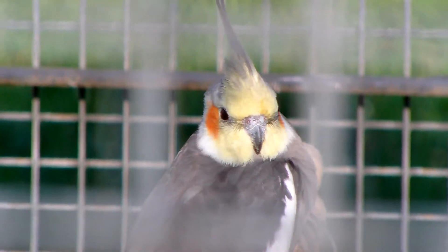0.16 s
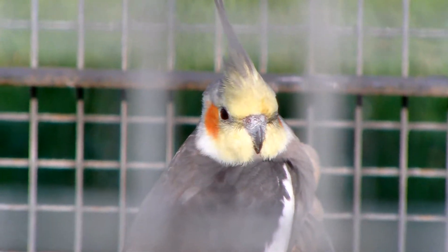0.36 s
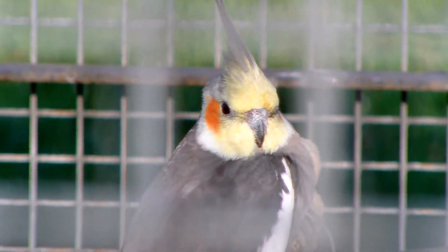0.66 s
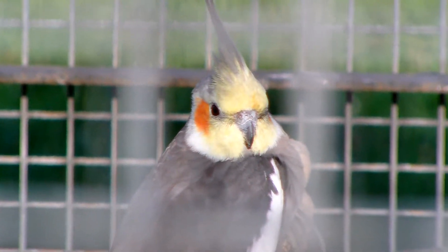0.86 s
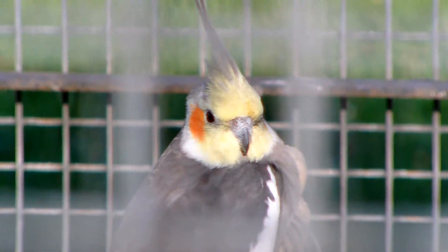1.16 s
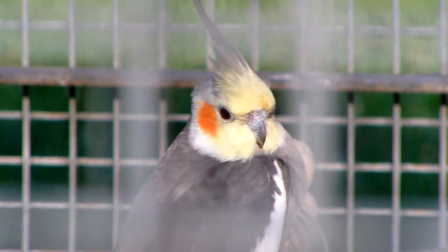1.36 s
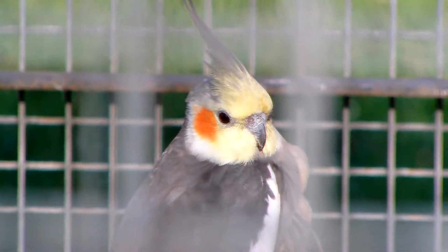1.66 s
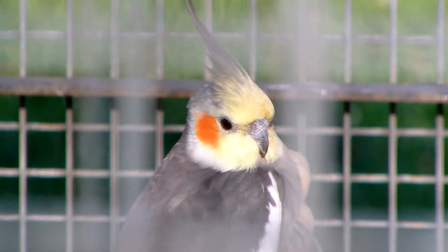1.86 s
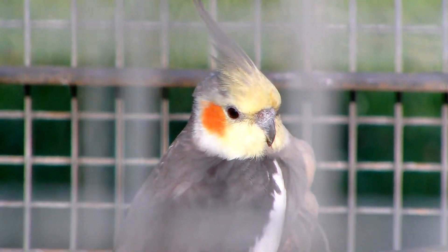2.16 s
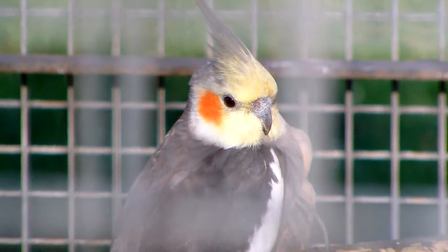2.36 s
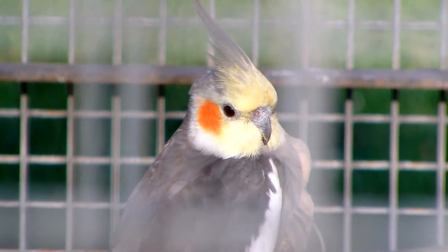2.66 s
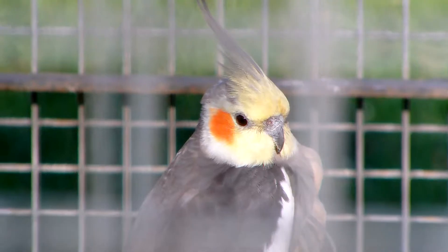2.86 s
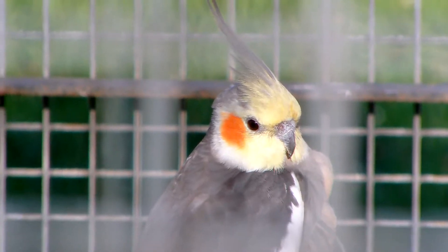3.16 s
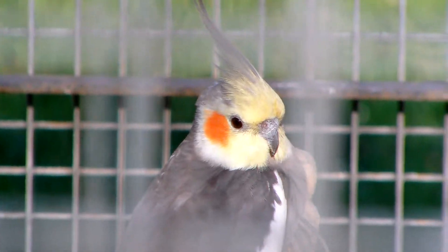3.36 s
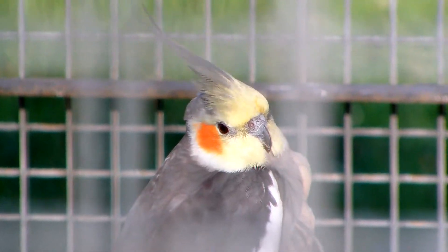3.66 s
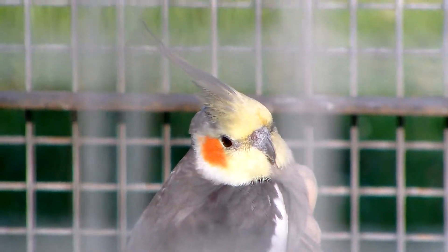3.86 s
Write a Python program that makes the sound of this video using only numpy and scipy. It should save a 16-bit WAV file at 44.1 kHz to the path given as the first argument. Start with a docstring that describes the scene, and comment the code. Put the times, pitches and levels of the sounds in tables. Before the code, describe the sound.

A nearby cockatiel opens with one loud, very short falling shriek, briefly echoed by close walls. From about 2.1 to 2.7 seconds it gives a softer, buzzing call that rises in two steps. Small dry ticks come now and then, and distant birds whistle faintly from 1 second. Two brief, soft rustles follow near 3.5 and 4 seconds. A quiet steady rush and low hum lie underneath throughout.

```python
"""At a wire aviary, one microphone near a cockatiel, walls close by. A steady rush and low hum lie
under everything. The bird opens with a loud falling shriek in a faint haze of noise, and the
walls answer. Small dry ticks follow now and then, and from about 1 s other birds whistle far off.
Just after 2 s the cockatiel gives a softer call that rises in two steps, buzzing with a fast trill.
Two brief, soft rustles come near the end."""
import sys
import numpy as np
from scipy import signal
from scipy.fft import rfft, irfft, next_fast_len
from scipy.io import wavfile
from scipy.ndimage import map_coordinates

SR = 44100
rng = np.random.default_rng(int(sys.argv[2]) if len(sys.argv) > 2 else 0)


def store_pcm(level_fs):
    """Save levels as 16-bit WAV."""
    pcm = np.round(np.clip(level_fs, -1, 1) * 32767).astype(np.int16)
    wavfile.write(sys.argv[1], SR, np.atleast_2d(pcm).T)


N = 176400  # 4 s

# colours of the background rush, rumble and hiss (frequency [Hz], relative level [dB])
RUSH_COLOUR = [(190, -35.5), (330, -3), (777, 1), (1110, 1), (2260, -8), (3850, -10.5), (7350, -13.5),
               (11200, -21.5), (15700, -15)]
RUMBLE_COLOUR = [(10, -20.5), (25, 4.5), (50, -10), (110, -16.5), (190, -13.5), (330, -14), (600, -37)]
HIGH_COLOUR = [(1500, -28.5), (5000, -3), (8500, 4.5), (11500, -8.5), (16000, -18.5)]
# hollows in the rush and rumble (frequency [Hz], half width [Hz], depth [0-1])
HOLLOWS = [(302, 43, 0.7), (902, 60, .7)]
# course of the hiss (time [s], level [dB])
HISS_LEVEL = [(0, -77.5), (.44, -69), (.46, -64), (1.1, -67.5), (4, -71.5)]

# the shriek's fundamental (time [s], pitch [Hz])
SHRIEK_GLIDE = [(0, 3627), (.03, 3927), (.052, 3820), (.068, 3526), (.084, 3380), (.089, 3605),
                (.093, 3020), (.102, 2886), (.144, 2780), (.149, 2484), (.156, 2220), (.163, 1720)]
# its strength (time [s], fundamental [dB], overtones [dB], roughness [0-1])
SHRIEK_SHAPE = [(.002, -16, -33, 0.05), (.04, -17, -29.5, 0.02), (.07, -12.5, -26, 0.01),
                (.094, -21, -25, .12), (.115, -20.5, -21, .06), (.143, -14.5, -24.5, .05),
                (.15, -18, -16, .3), (.16, -37, -17.5, 0)]
# colours of its overtones and of a faint haze that swells with it (frequency [Hz], relative level [dB])
SHRIEK_COLOUR = [(3500, 14), (5600, -3.5), (7400, -0.5), (8700, -15), (10400, -3), (11400, -15),
                 (12500, -23), (14500, -16.5), (16000, -20)]
HAZE_COLOUR = [(25, 2.5), (100, -19.5), (170, -7.5), (260, -11.5), (3500, -13), (15000, -9.5)]
# the answer from the walls (frequency [Hz], time to fall 60 dB [s])
WALL_DECAY = [(500, 0.22), (2700, 0.12), (6000, 0.14), (14000, 0.098)]

# small dry ticks (time [s], level [dB])
TICK_HITS = [(0.763, -50), (1.037, -56.5), (1.405, -54.5), (2.432, -44), (3.033, -47.5), (3.339, -57),
             (3.673, -55.5), (3.866, -46)]
# what a tick rings with (frequency [Hz], relative level [dB])
TICK_RING = [(2884, 1), (4250, -8.5), (8500, -17)]

# far birds, short and long notes (time [s], length [s], from pitch [Hz], to pitch [Hz], level [dB])
FAR_CHIRPS = [(.99, .064, 5630, 5250, -69), (1.15, .1, 6900, 6560, -69), (1.655, .051, 4050, 3230, -66),
              (3.0, .073, 7500, 6300, -64.5), (3.25, .08, 6400, 5570, -66)]
FAR_LONG_NOTES = [(1.67, .22, 4760, 4735, -68), (1.78, 1.35, 5630, 5600, -71), (3.03, .8, 3270, 3060, -71),
                  (3.82, .165, 3065, 3035, -66)]

# the rising call (time [s], pitch [Hz], fundamental [dB], overtones [dB],
# overtone loss [dB/octave], trill depth [share of pitch])
RISING_SHAPE = [(2.142, 1410, -55.5, -46, 3, 0.0073), (2.18, 1520, -59, -46, -0.5, 0.019),
                (2.22, 1660, -51, -39.5, 2.5, 0.033), (2.257, 1730, -47, -43, -0.5, 0.042),
                (2.308, 1700, -47, -40, 1.5, 0.047), (2.345, 1690, -62, -42.5, 4, 0.021),
                (2.385, 1710, -49, -48.5, 12, 0.05), (2.407, 1610, -69, -46, -0.5, 0.054),
                (2.445, 1875, -47, -34.5, 11, 0.017), (2.485, 1930, -40.5, -30.5, 12.5, .008),
                (2.51, 2090, -42, -40, 7, 0.049), (2.547, 2335, -37, -45.5, 4.5, 0.052),
                (2.634, 2290, -36.5, -42.5, 10, 0.046), (2.674, 2400, -33, -41, 9, 0.032),
                (2.72, 2420, -40.5, -38, 2.5, 0.029), (2.739, 2170, -44, -35, 24, 0.098)]
# its trill (time [s], rate [Hz])
TRILL_SPEED = [(2.36, 125), (2.52, 161.8)]
# colours of the throat and of the call's air noise (frequency [Hz], relative level [dB])
THROAT_COLOUR = [(3400, 0), (3850, 6), (4300, -4), (4800, 0), (5750, 1), (7000, -2), (7800, -7), (9700, -8),
                 (11000, -17), (12100, -12), (13500, -26)]
RASP_COLOUR = [(1200, -5), (8500, -0.5), (16000, -8.5)]

# soft rustles (time [s], half length [s], level [dB])
RUSTLE_SWELLS = [(3.463, 0.013, -59), (3.953, 0.016, -61.5)]


def amp(db):
    """Decibels to gain."""
    return 10 ** (np.asarray(db) / 20)


def clock():
    """The time of each sample."""
    return np.arange(N) / SR


def along(points, hz):
    """Read (frequency, value) points on a log axis."""
    freqs, values = np.transpose(points)
    return np.interp(np.log(hz + 1), np.log(freqs + 1), values)


def curves(rows):
    """One value per sample for each column after the time."""
    times, *columns = np.transpose(rows)
    return [np.interp(clock(), times, column) for column in columns]


def wobble(rate):
    """A smooth random curve, rate knots a second."""
    return map_coordinates(rng.standard_normal(N // 8), [clock() * rate + 2], mode="wrap")


def filtered(x, response):
    """Shape x by a gain that depends on frequency."""
    size = next_fast_len(N + SR // 2)
    return irfft(rfft(x, size) * response(np.fft.rfftfreq(size, 1 / SR)), size)[:N]


def noise(colour):
    """Coloured noise of rms 1."""
    x = filtered(rng.standard_normal(N), lambda hz: amp(along(colour, hz)))
    return x / np.sqrt(np.mean(x ** 2) + 1e-20)


def gate(start, end, attack_s, release_s):
    """1 from start to end, with ramps before and after."""
    t = clock()
    return np.clip(1 + (t - start) / attack_s, 0, 1) * np.clip(1 - (t - end) / release_s, 0, 1)


def phase_of(hz):
    """The running phase of a changing frequency."""
    return 2 * np.pi * np.cumsum(hz) / SR


def tone(hz):
    """A sine of rms 1 that follows a pitch."""
    return np.sqrt(2) * np.sin(phase_of(hz))


def harmonics(pitch, orders, gains):
    """A stack of partials of rms 1 on one pitch."""
    gains = gains * (orders * pitch < SR / 2)
    stack = np.sum(gains * np.sin(orders * phase_of(pitch)), axis=0)
    return np.sqrt(2) * stack / np.sqrt(np.sum(gains ** 2, axis=0) + 1e-20)


def background():
    """The background: a rush and a rumble with two narrow hollows in them, a wavering hum and a little high
    hiss."""
    def hollows(hz):
        dips = [1 - min(depth, 1) * np.exp(-((hz - centre) / width) ** 2)
                for centre, width, depth in HOLLOWS]
        return np.prod(dips, axis=0)

    rush = amp(-59.5) * noise(RUSH_COLOUR)
    rumble = amp(-69.5 + wobble(6.1)) * noise(RUMBLE_COLOUR)
    hum = amp(-81.5) * tone(hz=210 * (1 + .046 * wobble(47)))
    hiss = amp(curves(HISS_LEVEL)[0]) * noise(HIGH_COLOUR)
    return filtered(rush + rumble, hollows) + hum + hiss


def shriek():
    """The near cockatiel: a whistle that arches, breaks to a lower note and plunges, growing harsher."""
    jitter, flutter_db, haze_db = .007, 2, -23.5
    pitch = curves(SHRIEK_GLIDE)[0] * (1 + jitter * wobble(300))
    base_db, over_db, rough = curves(SHRIEK_SHAPE)
    orders = np.arange(2, 7)[:, None]
    flutter = amp(flutter_db * np.array([wobble(160) for _ in orders]))
    overtones = harmonics(pitch, orders, flutter * amp(along(SHRIEK_COLOUR, orders * pitch)))
    voice = amp(base_db) * tone(pitch) + amp(over_db) * overtones
    voice *= (1 + rough * wobble(1800)) / np.hypot(1, rough)
    haze = amp(haze_db) * np.hypot(amp(base_db), 2 * amp(over_db)) * noise(HAZE_COLOUR)
    return (voice + haze) * gate(SHRIEK_SHAPE[0][0], end=.16, attack_s=.0035, release_s=.0035)


def with_walls(x, wet_db):
    """At the microphone: the direct sound, a short answer from nearby walls and a faint, dull tail."""
    late_db, late_t60_s, delay_s = -30.5, .99, .0027
    hz, t, spectrum = signal.stft(rng.standard_normal(SR), SR, nperseg=256)
    early = amp(-60 * t / along(WALL_DECAY, hz)[:, None])
    late = amp(late_db - 60 * t / late_t60_s) / (1 + (hz[:, None] / 7000) ** 2)
    echo = signal.istft(spectrum * (early + late), SR, nperseg=256)[1]
    echo *= np.arange(len(echo)) / SR > delay_s
    wet = signal.fftconvolve(x, echo / np.linalg.norm(echo))[:N]
    return (x + amp(wet_db) * wet) / np.sqrt(1 + amp(wet_db) ** 2)


def ticks():
    """Each tick is one short ring and a snap of noise; harder ticks snap more."""
    peak_s, snap_t60_s, snap_growth = .0017, .01, 1.3
    out, hiss = np.zeros(N), noise(HIGH_COLOUR)
    loudest_db = max(db for _, db in TICK_HITS)
    for start, db in TICK_HITS:
        t = np.maximum(clock() - start, 0)
        envelope = t / peak_s * np.exp((1 - (t / peak_s) ** 2) / 2)
        ring = sum(amp(level) * np.sin(2 * np.pi * hz * t) for hz, level in TICK_RING)
        snap_db = -1 + snap_growth * (db - loudest_db)
        snap = (t > 0) * amp(snap_db - 60 * t / snap_t60_s) * hiss
        out += amp(db) * (envelope * ring + snap)
    return out


def far_whistles(notes, jitter):
    """Birds far from the microphone: faint gliding tones that swell, flicker and fade."""
    flicker_share, flicker_hz = .75, 90
    out = np.zeros(N)
    for start, length, from_hz, to_hz, db in notes:
        progress = np.clip((clock() - start) / length, 0, 1)
        pitch = (from_hz + (to_hz - from_hz) * progress) * (1 + jitter * wobble(330))
        phase = phase_of(pitch)
        flicker = wobble(flicker_hz) * np.sin(phase) + wobble(flicker_hz) * np.cos(phase)
        whistle = np.sqrt(1 - flicker_share) * tone(pitch) + np.sqrt(flicker_share) * flicker
        swell = (4 * progress * (1 - progress)) ** .25
        out += amp(db) * swell * whistle
    return out


def rising_call():
    """A reedy tone climbs in two steps; a fast trill makes it buzz, loudest at the top of each swing."""
    jitter, trill_unevenness, pulse_depth = .008, .12, .4
    rasp_db, rasp_growth = -59, .44  # the air noise grows with the overtones
    pitch, base_db, over_db, loss_db, depth = curves(RISING_SHAPE)
    trill_hz = curves(TRILL_SPEED)[0] * (1 + trill_unevenness * wobble(90))
    trill = np.sin(phase_of(trill_hz))
    pitch *= 1 + depth * trill + jitter * wobble(700)
    orders = np.arange(2, 7)[:, None]
    throat = amp(along(THROAT_COLOUR, orders * pitch) - loss_db * np.log2(orders))
    voice = amp(base_db) * tone(pitch) + amp(over_db) * harmonics(pitch, orders, throat)
    rasp = amp(rasp_db + rasp_growth * (over_db - over_db.mean())) * noise(RASP_COLOUR)
    pulsing = 1 + pulse_depth * trill * depth / depth.max()
    envelope = gate(RISING_SHAPE[0][0], RISING_SHAPE[-1][0], attack_s=.0045, release_s=.0032)
    return envelope * pulsing * (voice + rasp)


def rustles():
    """Two brief, soft swells of high noise."""
    swells = sum(amp(db) * np.exp(-.5 * ((clock() - at) / half) ** 2) for at, half, db in RUSTLE_SWELLS)
    return swells * noise(HIGH_COLOUR)


def scene():
    """The aviary in mono: shriek and ticks fairly dry, more of the walls on the other calls."""
    cockatiel = with_walls(shriek(), wet_db=-10) + with_walls(rising_call(), wet_db=0)
    far_birds = far_whistles(FAR_CHIRPS, jitter=.00813) + far_whistles(FAR_LONG_NOTES, jitter=.006)
    small_sounds = with_walls(ticks() + rustles(), wet_db=-23)
    return (background() + cockatiel + small_sounds + with_walls(far_birds, wet_db=1))[None]


def record(dry):
    """The camera's microphone channel passes nothing above 15.8 kHz."""
    return np.array([filtered(x, lambda hz: hz < 15800) for x in dry])


dry = scene()
out = record(dry)
store_pcm(out)
```